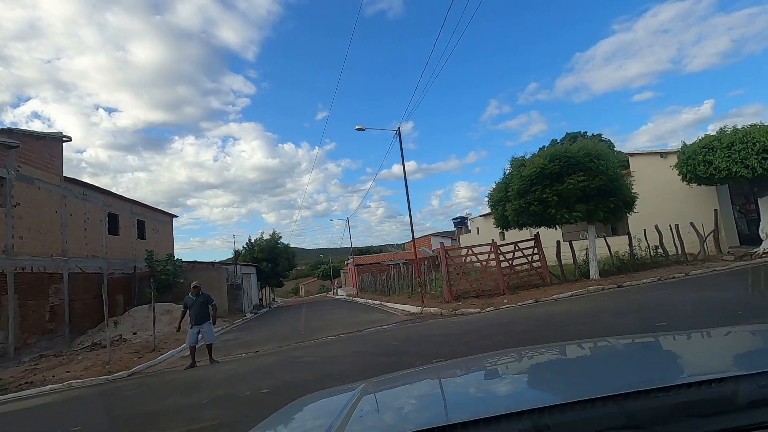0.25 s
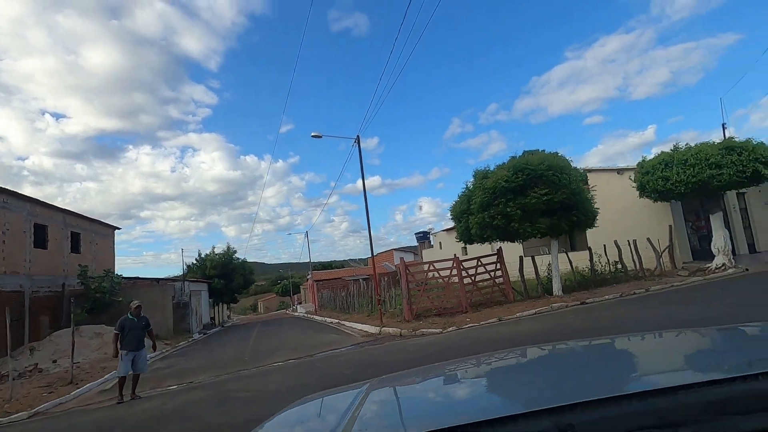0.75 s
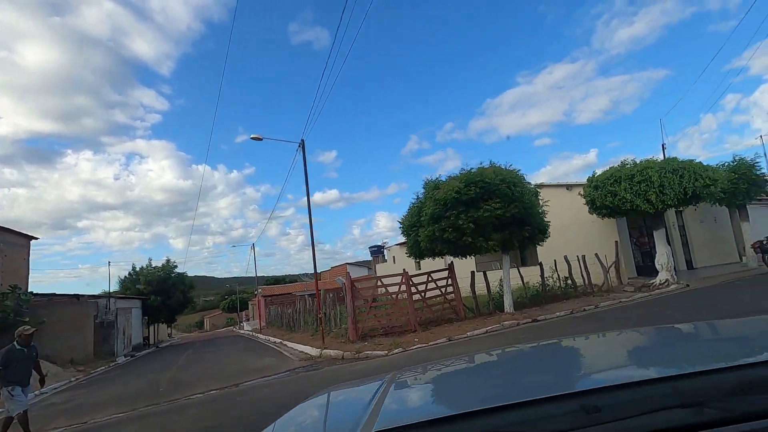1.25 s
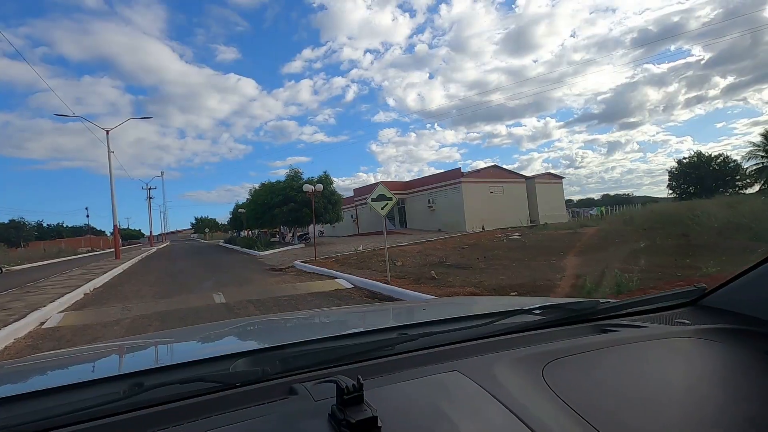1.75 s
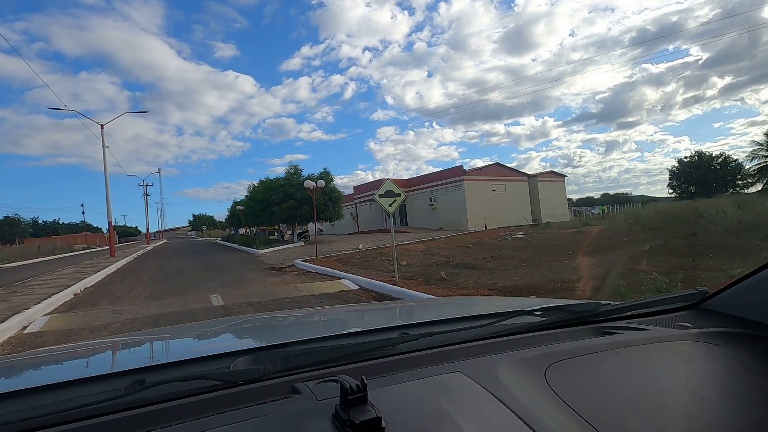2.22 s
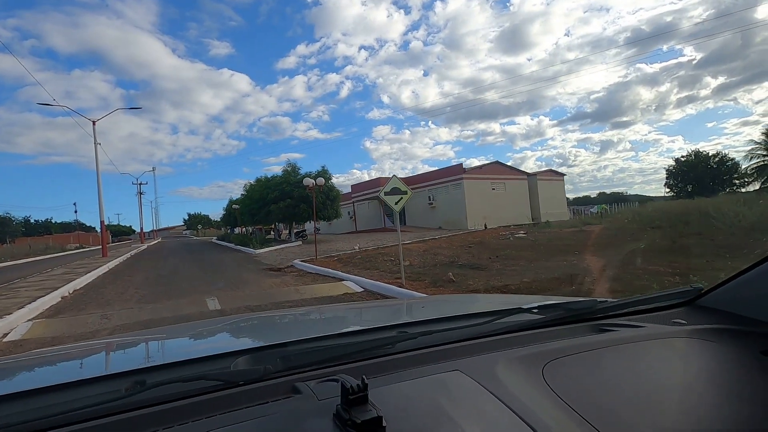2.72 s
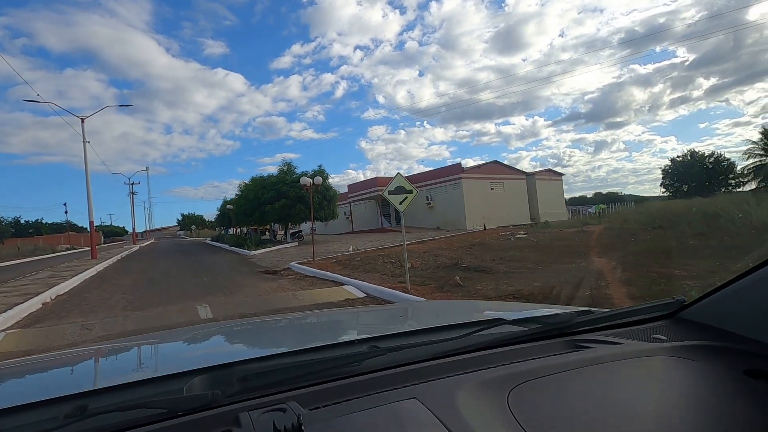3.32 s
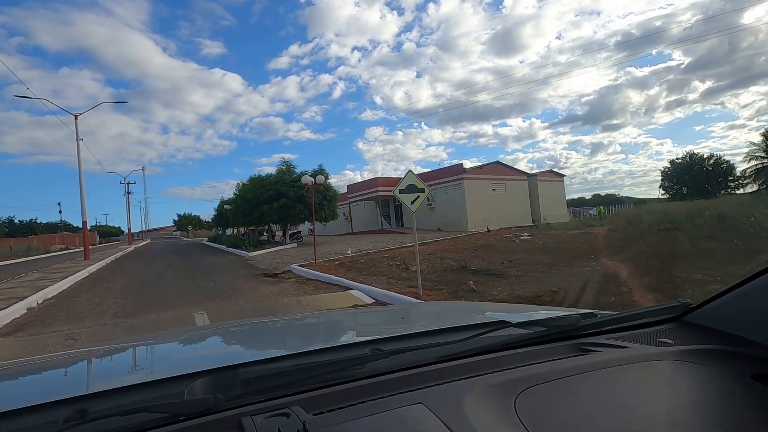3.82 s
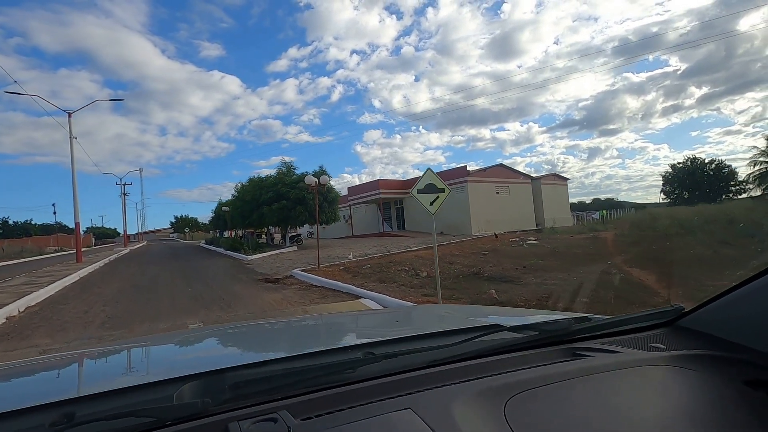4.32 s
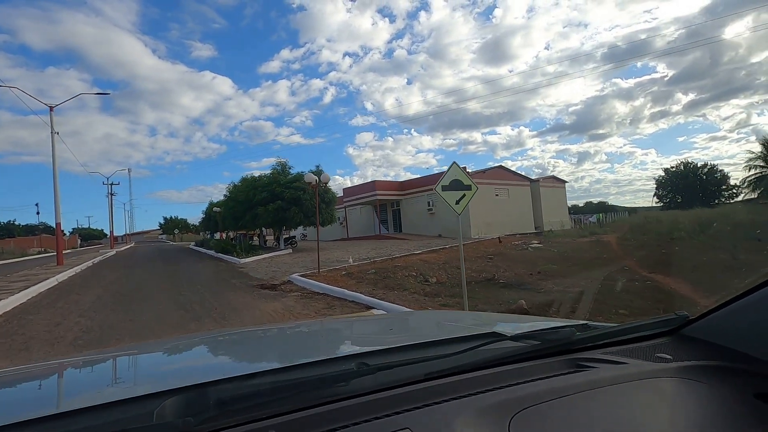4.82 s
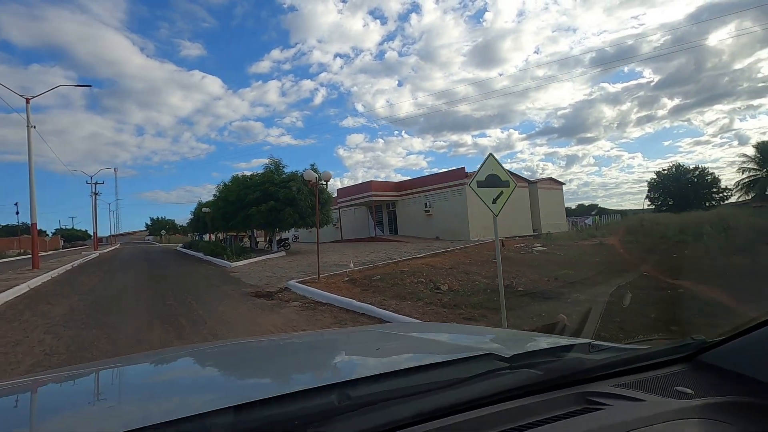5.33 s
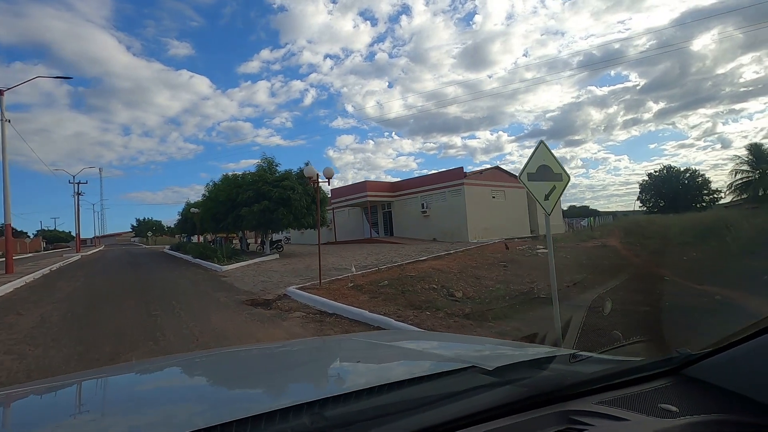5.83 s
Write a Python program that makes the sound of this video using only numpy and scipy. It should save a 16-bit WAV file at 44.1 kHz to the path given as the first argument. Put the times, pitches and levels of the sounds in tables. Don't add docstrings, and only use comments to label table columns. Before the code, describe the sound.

Inside a slow car, low engine boom and tyre rumble with trim ticks and thumps, cutting briefly to silence before a second, duller drive revs up.

```python
import sys
import numpy as np
from scipy import signal
from scipy.fft import rfft, irfft, next_fast_len
from scipy.io import wavfile
from scipy.ndimage import uniform_filter1d

SR = 44100
rng = np.random.default_rng(int(sys.argv[2]) if len(sys.argv) > 2 else 0)


def attenuation_scalar(level_db):
    decades = np.asarray(level_db, float) / 20
    return 10 ** decades


def put_to_file(sound):
    columns = np.atleast_2d(sound).T
    safe = np.clip(columns, -1, 1)
    whole_steps = np.round(safe * 32767)
    wavfile.write(sys.argv[1], SR, whole_steps.astype(np.int16))


N = 267554
TIME = np.arange(N) / SR
SIZE = next_fast_len(N)
FREQ = np.maximum(np.fft.rfftfreq(SIZE, 1 / SR), 1)
CUT_S, FADE_S = 1.59425, (1.795, 2.0)


def curve(rows):
    s, *columns = np.transpose(rows)
    return [np.interp(TIME, s, c) for c in columns]


def colour(points, hz):
    at, db = np.transpose(points)
    return np.interp(np.log(hz), np.log(at), db)


def unit(x):
    return x / np.sqrt(np.mean(x ** 2))


def walk(rate):
    k = int(SR / rate)
    steps = np.repeat(rng.standard_normal(N // k + 1), k)
    slewed = uniform_filter1d(uniform_filter1d(steps, k), k)
    return unit(slewed[:N])


def bell(s, half_s):
    return np.exp(-((TIME - s) / half_s) ** 2)


def swells(rows):
    return sum(height * bell(s, half_s) for s, height, half_s in rows)


def hump(hz, spread):
    return [(hz / 8, -80), (hz / spread ** 4, -30), (hz / spread, 0),
            (hz * spread, 0), (hz * spread ** 4, -30), (hz * 8, -100)]


def burst(shape, t60, rise_s):
    t = np.arange(8192) / SR
    hz = np.maximum(np.fft.rfftfreq(len(t), 1 / SR), 1)
    noise = irfft(attenuation_scalar(colour(shape, hz)) * rfft(rng.standard_normal((2, len(t)))))
    decay = 0.51 * attenuation_scalar(-60 * t / t60) + 0.76 * attenuation_scalar(-200 * t / t60)
    return unit(noise) * (1 - np.exp(-t / rise_s)) ** 2 * decay


def add(out, s, x):
    i = int(s * SR)
    out[:, i:i + x.shape[1]] += x[:, :N - i]


# t/s, firing rate f/Hz, boom level/dB, load level/dB of the upper multiples
ENGINE = [
    [(0.0, 24.87, -35, -39), (0.2, 25.5, -34, -37.5), (0.36, 25.38, -26.5, -37.5), (0.5, 22.55, -28.5, -29),
     (0.75, 23.98, -24.5, -26), (0.9, 25.5, -23.5, -35), (1.1, 26.93, -22, -29.5), (1.25, 27.33, -19, -30),
     (1.38, 27.53, -16.5, -36), (1.48, 27.87, -17, -29.5), (1.58, 28.63, -16.5, -27.5)],
    [(1.9, 27.01, -19.5, -29), (2.27, 27.27, -15.5, -36.5), (2.45, 27.33, -22, -29),
     (2.65, 27.63, -22, -27.5), (2.8, 28.92, -23, -25.5), (2.96, 30.89, -15, -32), (3.3, 35.29, -14.5, -31),
     (3.6, 36.95, -20, -29.5), (3.85, 36.9, -18.5, -36.5), (4.1, 36.45, -14.5, -38),
     (4.35, 33.82, -18, -37.5), (4.62, 29.89, -16, -34.5), (4.9, 32.81, -15, -42),
     (5.15, 31.95, -17, -40.5), (5.45, 33.49, -18.5, -44), (5.85, 31.64, -18, -36), (6.06, 31.08, -20, -40)],
]
# t/s, level/dB, half length/s
SLACK = [(.15, 3, .05), (.52, -11, 0.059), (2.04, -13.5, 0.117), (2.36, -6, .045), (2.5, -15.5, 0.057),
         (1.9, -4, .08), (3.14, -9.5, 0.061), (4.56, -7, 0.076), (5.01, -5, 0.0806), (5.74, -7, 0.15)]


def engine(rows, rough_db, wobble_hz, half_db, flutter_db, crest, lead):
    hz, boom_db, load_db = curve(rows)
    third_db = load_db - 5.5 - 2 * np.maximum(hz - 27.6, 0)
    levels = [boom_db + swells(SLACK), load_db + flutter_db * walk(7.9), third_db + flutter_db * walk(7.6)]
    turn = 2 * np.pi * np.cumsum(hz + wobble_hz * walk(9)) / SR
    turn -= turn[crest] + lead
    tones = 0
    for k, db in enumerate(levels):
        rough = k * (rough_db * walk(18) - 1.0)
        tones = tones + attenuation_scalar(db + rough) * np.cos((k + 1) * turn + 1.44 * k)
    half_orders = np.cos(turn / 2) + 0.21 * np.cos(3 * turn / 2)
    halves = attenuation_scalar(levels[0] + half_db + 3.0 * walk(4.5)) * half_orders
    return np.sqrt(2) * (tones + halves)


# f/Hz, level/dB per Hz
THUMP = [(40, -13.5), (150, -5), (350, -5.5), (700, -18.5), (1500, -26), (4000, -43.5), (16000, -97.5)]
# t/s, peak level/dB, t60/s, panel f/Hz
THUMPS = [(0.558, -27.5, 0.12, 195.3), (0.73, -25, 0.113, 148), (0.76, -20, 0.091, 175),
          (0.855, -26, 0.074, 137), (1.394, -14, 0.11, 290), (1.409, -19, .08, 520),
          (1.439, -20.5, 0.085, 143), (2.069, -25.5, 0.19, 174), (2.199, -19.5, 0.14, 380),
          (2.456, -32, 0.079, 250), (2.292, -14, 0.066, 520), (2.321, -12.5, 0.11, 267)]


def wheels():
    out = np.zeros((2, N))
    for s, db, t60, hz in THUMPS:
        thud = burst(THUMP, t60, rise_s=0.0027)
        panel = burst(hump(hz, 0.9), 1.17 * t60, rise_s=0.0066)
        knock = thud + 0.55 * panel
        add(out, s, attenuation_scalar(db - 4.5) * knock[[0, 0]])
    return out


# f/Hz, level/dB per Hz
TRIM = [(710, -55.5), (1200, -19.5), (2160, -19.5), (2340, -15.5), (3250, -15.5), (3600, -3.5), (4120, -3),
        (4810, -5.5), (6030, -17), (8040, -14), (11300, -34.5), (13200, -39.5), (14000, -57)]
# f/Hz, level/dB per Hz
TAP = [(880, -33.5), (1500, -1), (1790, -8.5), (2510, -2.5), (2810, -7), (3540, -1.5), (4650, -7),
       (5060, -7.5), (14000, -40)]
# t/s, peak level/dB, ring f/Hz, snap share [0-1]
TICKS = [(0.2871, -25, 3500, 0.2), (0.2997, -15.5, 4600, 0.92), (0.3106, -24.5, 4260, 0.2),
         (0.385, -45, 3140, 0.2), (0.6371, -44, 2850, 0.1), (0.6885, -35, 3800, 0),
         (0.7632, -40.5, 2980, 0.1), (0.7993, -45.5, 3410, 0.4), (0.985, -41, 3560, 0.1),
         (1.048, -34.5, 3840, 0.2), (1.1248, -42, 4640, 0.3), (1.142, -39.5, 2930, 0.2),
         (1.1808, -32, 4840, 0), (1.3649, -43.5, 2950, 0.1), (1.3842, -33, 4790, .3),
         (1.3892, -24.5, 4200, 0.1), (1.4299, -39, 3880, 0), (1.9624, -45.5, 2800, 0.3),
         (2.291, -38, 3260, 0), (2.322, -40, 2880, 0.04), (2.5146, -44, 3830, 0.1),
         (2.894, -46.5, 2870, 0.28), (4.4488, -51.5, 3580, 0.62), (5.0002, -53, 6190, 0.3),
         (2.01, -45.5, 2700, 0), (2.62, -51, 3500, 0.2), (4.31, -58.5, 4980, .5), (4.35, -58.5, 5000, .5),
         (4.75, -55.5, 5000, 0.6)]


def trim():
    out = np.zeros((2, N))
    t60 = 0.0737
    for s, db, hz, snap in TICKS:
        share = 0.06 - 0.054 * snap
        bright = burst(TRIM, t60, rise_s=0.0004)
        dull = burst(TAP, t60, rise_s=0.002)
        crack = np.sqrt(snap) * bright + np.sqrt(1 - snap) * dull
        narrow = burst(hump(hz, 0.95), 1.3 * t60, rise_s=0.00093)
        mid, side = np.sqrt(1 - share) * crack + np.sqrt(share) * narrow
        wide = s < CUT_S
        left = mid + .25 * wide * side
        right = np.roll(mid, -1 * wide) - .25 * wide * side
        add(out, s, attenuation_scalar(db - 5.0) * np.array([left, right]))
    return out


def rustle():
    slide = [(3500, -30.5), (5500, -0.5), (7800, 0.0), (10500, -15.5), (15000, -48)]  # f/Hz, level/dB per Hz
    fine = attenuation_scalar(colour(slide, FREQ)) + 1.3 * attenuation_scalar(colour(hump(7750, 1.3), FREQ))
    hiss = unit(irfft(fine * rfft(rng.standard_normal((2, SIZE))), SIZE)[:, :N])
    return hiss * attenuation_scalar(-63.5 + 3.3 * walk(60)) * np.exp(-((TIME - .76) / .055) ** 4)


def ring(rows, rise_s, split, head):
    t = np.arange(8192) / SR
    hz, db, t60 = np.transpose(rows)[:, :, None]
    twin, lag = rng.uniform(-1, 1, (len(rows), 2)).T[:, :, None]
    turn = 2 * np.pi * hz * t + np.array([lag, -lag]) * 0.45
    detune = 1 + split * (np.sign(twin) + twin / 2)
    tones = attenuation_scalar(db - 60 * t / t60) * (np.sin(turn) + 0.32 * np.sin(turn * detune))
    return tones.sum(axis=1) * (1 - np.exp(-t / rise_s)) ** 2 * (1 + head * attenuation_scalar(-60 * t / 0.018))


# f/Hz, level/dB, t60/s
SNAP = [(2356.4, -16, .07), (3092, -21, .07), (3412, -12, .075), (3716, -7.5, .075), (3995, -2, 0.0683),
        (4269, -6, 0.088), (4368, -3, 0.066), (4430, -6.5, 0.066), (4610, -1.5, 0.056), (5300, -17, .07),
        (5560, -17.5, .04), (7300, -19.5, 0.0813), (7700, -17.5, 0.0547), (8610, -23, .05)]
# t/s, f/Hz, peak
# level/dB, t60/s
RINGS = [(0.288, 3000, -42, .04), (0.288, 7000, -44.5, .035), (0.385, 7700, -57, .04),
         (0.638, 6180, -54, 0.037), (0.686, 5082, -47.5, .04), (0.687, 2827, -43, 0.061),
         (0.690, 3817, -46, 0.076), (0.763, 2770, -45.5, .04), (0.766, 3900, -51.5, .04),
         (0.797, 5880, -52, 0.055), (0.985, 3500, -45, 0.035), (1.047, 3850, -41, .08),
         (1.049, 2697, -47.5, .03), (1.049, 7670, -61, .08), (1.128, 5700, -51.5, .04),
         (1.182, 4780, -34, 0.031), (1.183, 4300, -42, 0.051), (1.183, 3602, -47, .06),
         (1.183, 2891, -45, .05), (1.183, 2494, -45, 0.055), (1.366, 4470, -55, 0.038),
         (1.390, 2520, -34, 0.056), (1.390, 3306, -40, 0.056), (1.390, 3630, -41, 0.052),
         (1.390, 4060, -41.5, 0.044), (1.390, 4530, -37, 0.036), (1.390, 2030, -43, 0.054),
         (1.430, 3705, -45, .05), (1.430, 3090, -44.5, .04), (1.430, 7330, -63, 0.054),
         (1.965, 2440, -41, .04), (1.965, 7140, -62, .04), (2.01, 2676, -45, .04),
         (2.295, 2424, -39, 0.064), (2.895, 7200, -68.5, .04), (4.449, 7200, -62, .04),
         (0.72, 7600, -57, .06), (0.733, 7800, -57, .06), (0.747, 7800, -57, .06), (2.326, 920, -36, .06),
         (2.328, 1410, -40, .05), (2.33, 5300, -51.5, .05), (0.3032, 4600, -30.5, .03),
         (0.311, 4300, -29, .05), (0.318, 3780, -36, 0.056), (1.394, 975, -41.5, .09),
         (1.390, 1450, -42, .05), (4.997, 6210, -62, .03), (5.132, 5400, -61, .04)]


def rings():
    out = np.zeros((2, N))
    add(out, 0.2997, attenuation_scalar(-20) * ring(SNAP, rise_s=0.0006, split=0.013, head=1.6))
    for s, *mode in RINGS:
        tone = ring([mode], rise_s=0.00093, split=0.016, head=.3)
        add(out, s, tone if s < CUT_S else tone[[0, 0]])
    return out


# f/Hz, left minus right level/dB
PORTS = [(1000, 1), (2400, 6), (4000, 4.5), (4800, 3.5), (5600, -3), (8000, -4), (11000, 1)]


def ports(x):
    tilt = attenuation_scalar(colour(PORTS, FREQ) * np.array([[.5], [-.5]]))
    tilted = irfft(rfft(x, SIZE) * tilt, SIZE)[:, :N]
    return np.where(TIME < CUT_S, tilted, x)


# t/s, f/Hz, rms level/dB, half length/s
HUMS = [(0.121, 150.2, -34, .06), (0.763, 175.3, -31.5, 0.058), (0.946, 200, -35, 0.051),
        (1.1, 298, -45.5, 0.2), (1.377, 300, -40, 0.054), (2.72, 84.1, -32, .07), (.65, 49, -33, .14),
        (1.25, 265, -40, .08), (2.5, 280, -41, .08), (1.97, 72, -33, .07), (.42, 30, -31, .06),
        (1.42, 190, -36, .04), (1.45, 135, -30.5, 0.032), (2.07, 160, -35, .04), (2.324, 266, -34.5, 0.033),
        (2.717, 55.83, -30, 0.122), (2.917, 203.8, -39.5, 0.032), (3.197, 199, -38.5, 0.06),
        (4.455, 128, -39.5, .05), (4.7, 60.5, -34, 0.082), (5.24, 199.8, -44, 0.055),
        (5.55, 131.7, -35, 0.043), (5.896, 57.92, -32, 0.055), (5.92, 198.1, -38.5, 0.074),
        (5.95, 97.6, -37.5, 0.069)]


def hums():
    waver = np.cumsum(1 + .02 * walk(20)) / SR
    return sum(np.sqrt(2) * attenuation_scalar(db) * bell(s, half_s) * np.sin(2 * np.pi * hz * waver)
               for s, hz, db, half_s in HUMS)


# t/s, level/dB
ROAD = [
    [(0.0, -46), (0.14, -45), (0.5, -44), (0.8, -42), (1.24, -41.5), (1.45, -44.5)],
    [(1.99, -42.5), (2.17, -41.5), (2.6, -44), (3.24, -48), (4.4, -49.5), (5.1, -49), (5.5, -46),
     (6.04, -45.5)],
]
# f/Hz, level/dB per Hz
BODY = [
    [(7.1, -31), (12, -2.5), (32, -2), (48, -5), (92, -11.5), (153, -11.5), (245, -21.5), (313, -19),
     (450, -30), (580, -61), (990, -120)],
    [(7.1, -32), (12, -1), (32, -1), (48, -7.5), (63, -6.5), (86, -14), (118, -21), (211, -23.5),
     (381, -29), (450, -34.5), (580, -63), (990, -120)],
]
# f/Hz, level/dB per Hz
CABIN = [
    [(240, -29), (400, -3), (445, -2), (640, -4), (816, -9), (1060, -3.5), (1170, -9.5), (1370, -9),
     (1690, -19), (3190, -16), (4670, -19), (5190, -26), (7700, -36.5), (15000, -59.5)],
    [(240, -30), (400, 3.5), (534, -8.5), (602, -5.5), (854, -14.5), (935, -15.5), (1120, -11),
     (1540, -17.5), (1660, -18), (2060, -22.5), (2870, -22), (4810, -30.5), (8430, -46), (15000, -65)],
]
# f/Hz, width/Hz, level/dB
PANELS = [
    [(25.5, 4.4, 7.5), (165, 18, -5.5), (296, 21, 1.5), (643, 43, 4.5), (1135, 140, 6), (1364, 40, 11)],
    [(78.5, 10, 6), (203, 11, 4.5), (340, 32, -1), (827.8, 100, 6), (1010, 100, -2), (1392, 40, 6),
     (1649.6, 100, 6), (6030, 210, 1.5), (6730, 200, -8.5)],
]
# f/Hz, side minus mid level/dB
WIDTH = [
    [(60, -14), (110, -26), (200, -29.5), (380, -16), (700, -11.5), (1290, -11), (2380, -2), (4400, -4.5),
     (8120, 4), (15000, 1)],
    [(60, -21.5), (110, -43.5), (200, -49), (380, -35.5), (700, -19.5), (1290, -17), (2380, -12),
     (4400, -8.5), (8120, -6.5), (15000, -5.5)],
]
# t/s, side level/dB
WIDEN = [
    (1.9, -29),
    (4.5, -16.5),
    (4.7, -4.5),
    (5.2, -2.5),
    (6.07, 2),
]
# t/s, level/dB, half length/s
JOLTS = [
    (.05, 2.5, 0.092),
    (2.39, 7, 0.08),
]
# t/s, level/dB, half length/s
GUSTS = [(.02, 3, 0.065), (.56, 4, 0.22), (.8, 0.5, 0.082), (2.9, 1.5, 0.22), (3.9, 0, 0.11),
         (4.8, 1.5, .1), (5.4, 0, 0.13), (6.0, -2, 0.28)]
# t/s, level/dB, half length/s, centre f/Hz
PATCHES = [(1.199, -4, .1, 150.2), (1.252, 4, .15, 267.5), (2.222, -4, .1, 169.6),
           (2.499, -2, 0.064, 109.6), (4.95, -5, .15, 199), (5.75, -2.5, 0.16, 2995),
           (3.199, -2, 0.14, 2614), (0.077, 6, .08, 35.82), (0.349, 3.5, .15, 860), (0.955, -3, .1, 100.7),
           (1.38, -8.5, 0.26, 24.06), (1.446, 3.5, 0.053, 131.2), (2.301, 5.5, 0.11, 90),
           (2.65, 1, .1, 85.13), (2.3, 3, 0.17, 1396), (4, -7.5, 1.0, 22.01), (4.849, -1, .1, 3304),
           (5.201, 0, 0.2, 2003), (5.849, -6.5, .05, 110), (0.742, 4, .03, 7750), (1.069, 3.5, .04, 7780),
           (0.152, 4, .15, 901), (0.199, -1, .15, 280), (0.681, 5, .1, 50.8), (0.751, 5, .1, 179),
           (1.249, -4, 0.066, 197), (1.904, -1.5, .08, 400), (1.951, 5.5, .1, 70.6), (2.018, -3, .1, 190),
           (2.026, 6.5, 0.027, 1400), (2.2, 0.5, .05, 383), (2.499, 1, .12, 74.6), (3.696, -4.5, .6, 52.2),
           (3.151, 2.5, 0.083, 200.2), (3.451, -3.5, .1, 480), (3.898, 2.5, .1, 4950),
           (4.401, 1.5, .1, 128), (4.65, 2, .1, 2150), (4.701, -2, .15, 363), (5.152, -5, .1, 139),
           (5.301, 2.5, 0.28, 604), (5.351, -4, 0.17, 1609), (5.4, 4, .16, 3200), (5.55, 1, .08, 139.6),
           (5.7, -2.5, .1, 552.4), (5.949, 1.5, .1, 198.6)]
HEAVE_DB = [-29.5, -33.5]
RUMBLE_DB, HISS_DB, TREAD_DB = [11, 12], [-15, -13], [-18.5, -12.5]
HEAVE_TOP_HZ, TREAD_HZ, PATCH_OCTAVES = 46.7, 1660.6, 0.45


def cabin(k, widen_db):
    db = np.where(FREQ < 450, colour(BODY[k], FREQ), colour(CABIN[k], FREQ))
    db += sum(g / (1 + (2 * (FREQ - f) / w) ** 2) for f, w, g in PANELS[k])
    mid = attenuation_scalar(db) * rfft(rng.standard_normal(SIZE))
    side = attenuation_scalar(db + colour(WIDTH[k], FREQ)) * rfft(rng.standard_normal(SIZE))
    spectra = np.array([mid, side])

    roar_db = curve(ROAD[k])[0]
    rumble_db = roar_db + RUMBLE_DB[k]
    hiss_db = roar_db + HISS_DB[k] + swells(GUSTS)
    whine_fade = 1 / (1 + np.exp((5.38 - TIME) / 0.035))
    tread_db = roar_db + TREAD_DB[k] - 5 * whine_fade
    layers = [(8, HEAVE_TOP_HZ, HEAVE_DB[k] + swells(JOLTS)), (HEAVE_TOP_HZ, 100, rumble_db - 0.5),
              (100, 450, rumble_db), (450, TREAD_HZ, roar_db),
              (TREAD_HZ, 2100, tread_db), (2100, 16000, hiss_db)]

    bells = np.array([swells([row[:3]]) for row in PATCHES])
    patch_hz = np.transpose(PATCHES)[3]
    out = np.zeros((2, N))
    for low, high, level_db in layers:
        count = int(np.ceil(3 * np.log2(high / low)))
        edges = np.geomspace(low, high, count + 1)
        shared, total = 0.66 * walk(11), 0
        for a, b in zip(edges[:-1], edges[1:]):
            band = irfft(spectra * ((FREQ >= a) & (FREQ < b)), SIZE)[:, :N]
            near = np.exp(-(np.log2(np.sqrt(a * b) / patch_hz) / PATCH_OCTAVES) ** 2)
            flicker = (1.3 if b < 500 else .8) * walk(6)
            total = total + attenuation_scalar(near @ bells + shared + flicker) * band
        out += attenuation_scalar(level_db) * total / np.sqrt(np.mean(total[0] ** 2))
    mid, side = out[0], attenuation_scalar(widen_db) * out[1]
    return np.array([mid + side, mid - side])


def scene():
    first = engine(ENGINE[0], 0.8, 0.37, -25.5, flutter_db=0.5, crest=int(CUT_S * SR), lead=0.33)
    first = first * (TIME < CUT_S) + cabin(0, 0)
    first *= attenuation_scalar(np.array([[.45], [-.45]]))
    first[0] = np.roll(first[0], 1)
    second = engine(ENGINE[1], 0.66, .2, -31.5, flutter_db=1.5, crest=N - 1, lead=2.564)
    second = second + cabin(1, curve(WIDEN)[0])
    drives = np.where(TIME < FADE_S[0], first, second)
    return drives + ports(trim() + rustle() + rings()) + wheels() + hums()


# t/s, ceiling shift f/Hz, half length/s
CEILING_SHIFTS = [(.23, -2500, .04), (.9, -2500, .07), (1.23, -2500, .05), (1.53, -2500, .04), (.5, 1500, .1),
                  (2.3, 2200, .3), (2.75, 1800, .12), (3.04, 3500, .07), (3.48, 2800, .08), (3.9, 2600, .06),
                  (4.3, 3200, .17), (4.6, 2500, .12), (5.4, 3000, .12),
                  (2.015, 4000, .016), (2.09, 4000, .008), (2.165, 4000, .01), (2.375, 4000, .022),
            (2.43, 4000, .01), (2.535, 4000, .01), (2.61, 4000, .008), (2.645, 4000, .01),
            (2.725, 4000, .01), (2.825, 4000, .014), (2.92, 2500, .07), (3.11, 2500, .035)]


def treble_ceiling(x):
    spectrum = rfft(x, SIZE)
    first = TIME < CUT_S
    ceiling_hz = np.where(first, 13600, 10300) + swells(CEILING_SHIFTS)
    ceiling_hz = ceiling_hz + np.where(first, 1200, 800) * walk(45)
    for low_hz in np.arange(10500, 16000, 500):
        band = irfft(spectrum * ((FREQ >= low_hz) & (FREQ < low_hz + 500)), SIZE)[:, :N]
        faint = uniform_filter1d(band[0] ** 2, 512) < attenuation_scalar(-84) ** 2
        x = x - .8 * band * uniform_filter1d(1. * faint * (low_hz > ceiling_hz), 256)
    return x


def top_cut(x):
    return signal.sosfilt(signal.butter(12, 15710, fs=SR, output="sos"), x)


def record(dry):
    dry = treble_ceiling(dry)
    fade = np.clip((TIME - FADE_S[0]) / (FADE_S[1] - FADE_S[0]), 0, 1)
    after = np.clip(1 - (TIME - CUT_S) / .026, 0, 1) ** .5 * (TIME >= CUT_S)
    smear = attenuation_scalar(-60.5) * unit(signal.lfilter([1], [1, -.9], rng.standard_normal((2, N))))
    gain = np.where(TIME < CUT_S, 1, attenuation_scalar(-22.5) * after + np.sin(np.pi / 2 * fade) ** 1.6)
    return top_cut(dry * gain + smear * after)


dry = scene()
out = record(dry)
put_to_file(out)
```